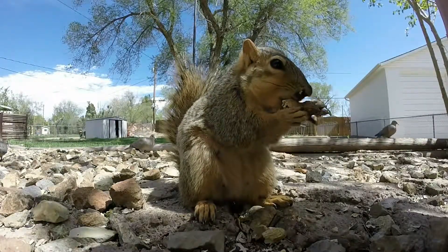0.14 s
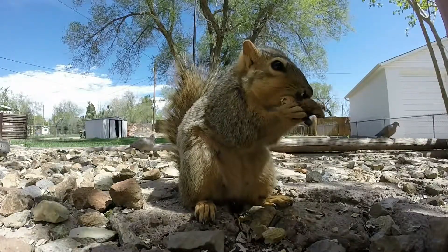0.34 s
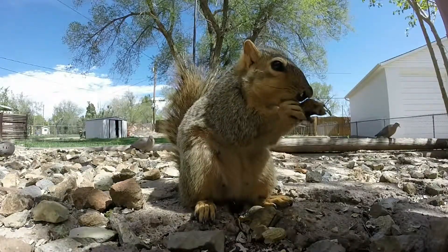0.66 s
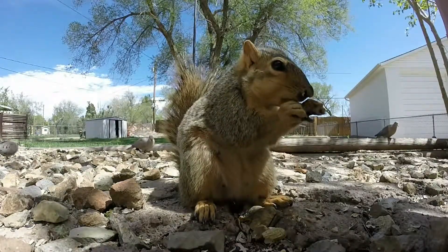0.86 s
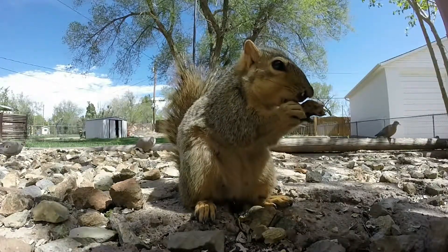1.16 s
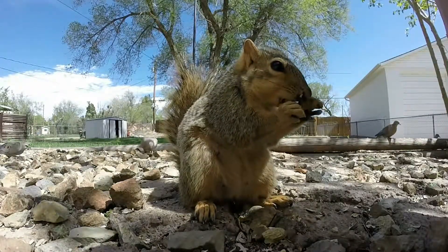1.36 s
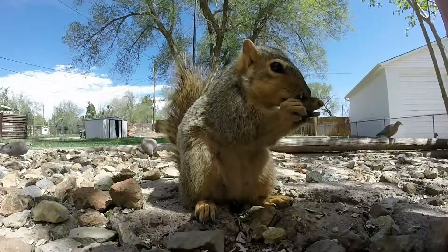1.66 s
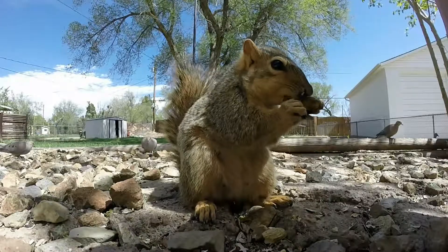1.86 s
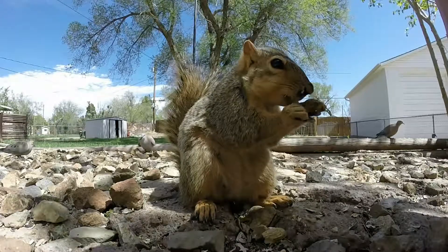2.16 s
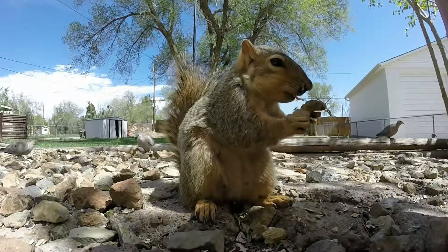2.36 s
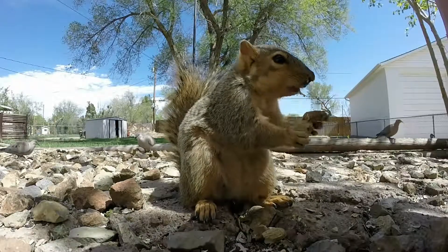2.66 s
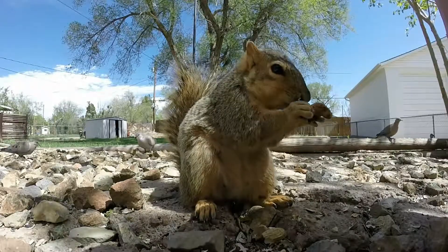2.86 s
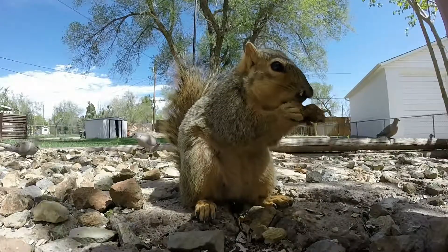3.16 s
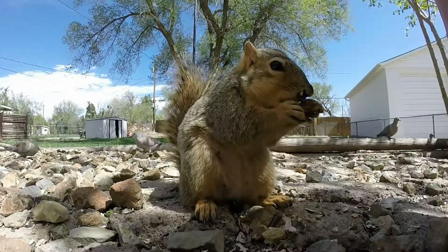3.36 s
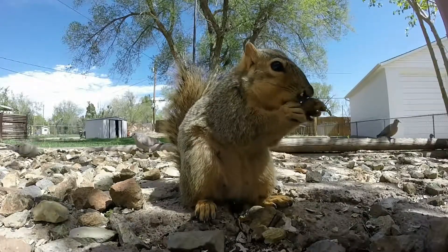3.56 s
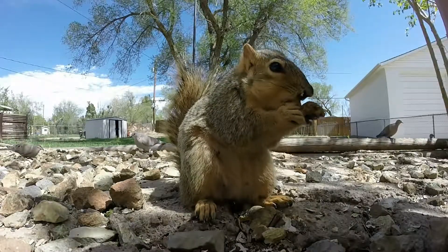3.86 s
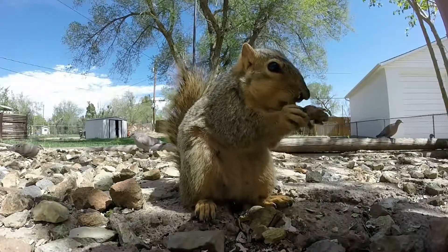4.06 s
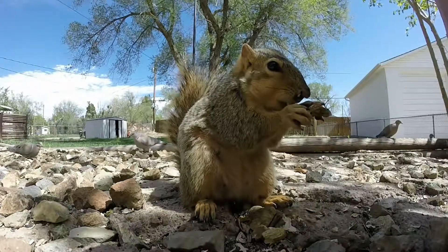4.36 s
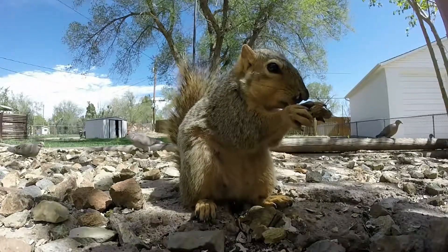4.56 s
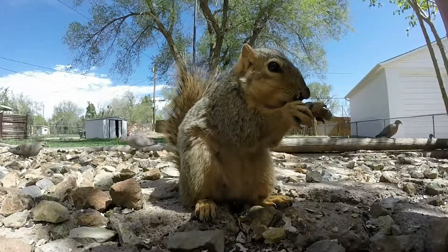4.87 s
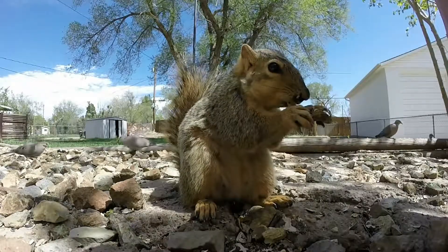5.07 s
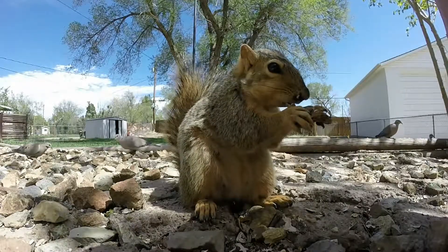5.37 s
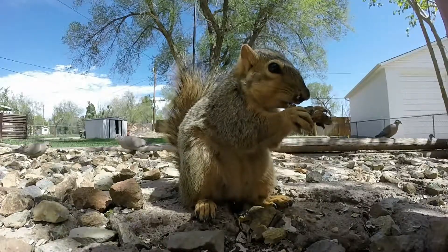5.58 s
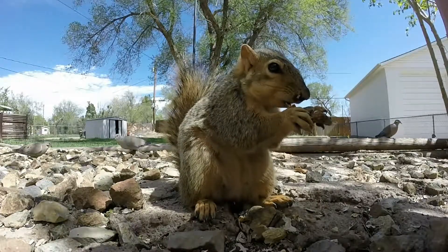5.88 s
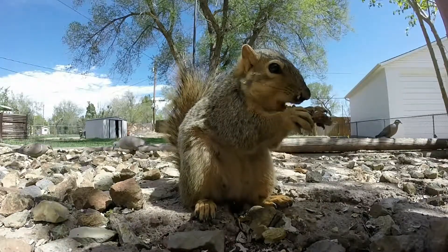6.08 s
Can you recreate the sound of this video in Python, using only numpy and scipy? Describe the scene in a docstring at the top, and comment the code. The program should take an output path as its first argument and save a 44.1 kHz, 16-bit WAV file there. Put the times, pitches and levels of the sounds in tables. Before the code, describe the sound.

In a quiet backyard, a squirrel's teeth scrape and crack a hard shell right by the microphone. It opens with sharp, high snaps as pieces break off, then goes on with rapid, crisp nibbling and short rests. The gnawing grows sparse and dies down toward the end, leaving a few faint, distant bird chirps, a low outdoor rumble and a barely audible pulsing hiss.

```python
"""A squirrel gnawing in a backyard

Close by, a squirrel's front teeth nibble a hard morsel in quick bouts, now and then drag
over its shell and snap pieces off. All of this makes the same short, bright tones ring.
Small birds chirp far away over a soft outdoor rumble and a faint pulsing hiss."""
import sys
import numpy as np
from scipy import signal
from scipy.fft import rfft, irfft
from scipy.io import wavfile

SR = 44100
rng = np.random.default_rng(int(sys.argv[2]) if len(sys.argv) > 2 else 0)


def persist_wave(psi):
    """Save psi, clipped to +-1, as 16-bit WAV."""
    counts = np.round(np.clip(psi, -1, 1) * 32767).astype(np.int16)
    wavfile.write(sys.argv[1], SR, np.atleast_2d(counts).T)


N = 274593
TIME = np.arange(N) / SR


def from_db(db):
    """Turn decibels into a number to multiply by."""
    return 10 ** (np.asarray(db) / 20)


def rms_one(x):
    """Scale a signal so that its average power is 1."""
    return x / np.sqrt(np.mean(x ** 2) + 1e-20)


def with_energy(rows, db):
    """Scale each row to its own total energy, given in dB."""
    return rows * (from_db(db) / np.linalg.norm(rows, axis=1))[:, None]


def drift(rate):
    """A random wander of about size 1 that turns about `rate` times a second."""
    points = rng.standard_normal(N // 20)
    return rms_one(np.interp(TIME * rate, np.arange(len(points)), points))


def noise(spectrum):
    """Noise of power 1, shaped by rows of frequency and level."""
    hz, db = np.transpose(spectrum)
    bins = np.maximum(np.fft.rfftfreq(N, 1 / SR), 1)
    gain = from_db(np.interp(np.log(bins), np.log(hz), db))
    return rms_one(irfft(rfft(rng.standard_normal(N)) * gain, N))


def ring(clicks, hz, width_hz):
    """Each click starts a tone; the greater the width, the sooner it fades."""
    decay, turn = np.exp(-np.pi * width_hz / SR), 2 * np.pi * hz / SR
    return signal.lfilter([0, np.sin(turn)], [1, -2 * decay * np.cos(turn), decay ** 2], clicks + 1e-18)


def arch(middle_s, length_s):
    """The samples that a short sound covers, and its smooth rise and fall."""
    start = max(int((middle_s - length_s / 2) * SR), 0)
    end = max(int((middle_s + length_s / 2) * SR), 0)
    return slice(start, end), np.cos(np.pi * (TIME[start:end] - middle_s) / length_s)


# The outdoor rumble. Each row: frequency in Hz, relative level in dB.
YARD_SPECTRUM = [(12, -34), (20, -4), (49, -2), (129, -4.5), (213, -7), (238, -8), (333, -10.5), (549, -14),
                 (649, -15.5), (1010, -18.5), (1130, -19.5), (4550, -28.5), (12100, -41.5), (13900, -41.5),
                 (15500, -53)]
def background(level_db=-56, sway_db=0.54, whine_db=-84):
    """Far traffic and air rumble softly, with a faint narrow hiss high up."""
    whine = rms_one(ring(rng.standard_normal(N), hz=8700, width_hz=450))
    rumble = from_db(level_db + sway_db * drift(4.18)) * noise(YARD_SPECTRUM)
    return rumble + from_db(whine_db) * whine


# The ringing tones of morsel and jaw. Each row: pitch in Hz, width in Hz, relative level in dB.
SHELL_TONES = [(2940, 300, -24), (3285, 210, -8.5), (3530, 140, -15.5), (4640, 190, 5.5), (5020, 320, -0.5),
               (5340, 470, -31), (5570, 110, -12.5), (6030, 115, -12), (6400, 240, -11.5), (6900, 210, -11),
               (7300, 410, -28), (8280, 220, -23.5), (9370, 380, -20.5), (10470, 360, -22.5),
               (11400, 280, -25.5), (12600, 400, -26), (14000, 900, -29)]
def shell(force, low_hz, high_hz, scatter_db):
    """The shell rings in one pitch range; scatter varies the tones' levels for each row of force."""
    rings = sum(from_db(db + scatter_db * rng.standard_normal((len(force), 1))) * ring(force, hz, width)
                for hz, width, db in SHELL_TONES if low_hz < hz < high_hz)
    return signal.sosfilt(signal.butter(3, [low_hz, high_hz], "band", fs=SR, output="sos"), rings)


# The shell's low, main, upper and top ranges. Each row: lower edge in Hz, upper edge in Hz.
PITCH_RANGES = [(2650, 3900), (4100, 5600), (5400, 7800), (7800, 15000)]
def range_gains(shares_db, hollow_db, bright_db, top_share=0.87):
    """Where the tooth lands sets the mix: hollowness lifts the low range, brightness the highest two."""
    lifts_db = [hollow_db, 0, bright_db, top_share * bright_db]
    return [from_db(share + lift) for share, lift in zip(shares_db, lifts_db)]


# How hard the squirrel nibbles, in bouts with rests. Each row: time in seconds, relative level in dB.
NIBBLE_EFFORT = [(0.0, -72), (0.14, -70), (0.18, -56), (0.42, -59.5), (0.69, -64), (0.8, -76), (0.9, -64),
                 (1.22, -79), (1.37, -58.5), (1.7, -68), (2.05, -67), (2.5, -82), (2.66, -60), (2.84, -85),
                 (3.15, -66.5), (3.76, -64), (4.05, -76), (6.23, -86)]
def nibbles(strokes_per_s=24, stroke_s=0.018, unevenness=0.25, spread_db=4, hollow_db=-5, bright_db=1):
    """List quick, light tooth strokes at the jaw's uneven pace, in rows like the drags below."""
    timing, strength = rng.standard_normal((N // 1000, 2)).T
    times = np.cumsum(np.exp(unevenness * timing)) / strokes_per_s
    levels = np.interp(times, *np.transpose(NIBBLE_EFFORT)) + spread_db * np.clip(strength, -2, 2)
    return [(middle, stroke_s, db, hollow_db, bright_db) for middle, db in zip(times, levels)]


# A scrape's share in each of the four ranges, low to top, in dB.
SCRAPE_MIX_DB = [-10, 0.5, -6, -20]
# Longer drags of the teeth. Each row: middle and length in seconds, then relative level,
# hollowness and brightness in dB.
TOOTH_DRAGS = [(0.06, 0.047, -56.5, -5, -11), (0.286, 0.053, -50.5, -8, -3.5), (1.527, 0.039, -58, 3, 0),
               (2.226, 0.026, -56, 0, -2), (2.274, 0.034, -61, 7.5, 2.5), (2.317, 0.029, -58, 11.5, 2),
               (2.378, 0.035, -59, 5, 4), (3.925, 0.033, -60, -2, 0)]
def scrapes(level_db=-2.0, slips_per_s=900):
    """In every drag and nibble the teeth stick and slip very fast, which rings the shell."""
    slips = (rng.random((1, N)) < slips_per_s / SR) * rng.standard_normal((1, N))
    rings = np.array([rms_one(shell(slips, *edges, scatter_db=0)[0]) for edges in PITCH_RANGES])
    out = np.zeros(N)
    for middle, length, db, hollow_db, bright_db in list(TOOTH_DRAGS) + nibbles():
        part, pressure = arch(middle, length)
        gains = range_gains(SCRAPE_MIX_DB, hollow_db, bright_db)
        out[part] += from_db(level_db + db) * pressure * np.dot(gains, rings[:, part])
    return out


# A snap's share in each of the four ranges, low to top, in dB.
SNAP_MIX_DB = [-10.5, 0, -4.5, -17.5]
# The shell cracks. Each row: time in seconds, then relative level, hollowness and brightness in dB.
SHELL_CRACKS = [(0.169, -37.5, -4, -9), (0.175, -41, -6, -14), (0.278, -41, -4, -6), (0.2902, -37, -9, -8),
                (0.334, -44, -6, -8), (0.367, -32.5, 4.5, -4), (0.3744, -13.5, -0.5, -5.5),
                (0.4012, -46, -12, -1), (0.429, -50, 8, 1), (0.536, -48.5, -12, -18),
                (0.7114, -22, -8, -8.5), (0.7558, -32, 6, 2), (0.769, -23.5, 5, -7.5),
                (0.9441, -37.5, 5, -2.5), (1.345, -47, 2, -10), (1.376, -41, 0, 0), (1.407, -49, 0, 4),
                (1.6246, -44.5, 0, 0), (1.6741, -38, 0, 2), (1.951, -53, 10.5, 6), (1.9903, -46.5, 0, 0),
                (2.0268, -46.5, 2, 8.5), (2.0919, -46.5, 0, -4), (2.1624, -40.5, -1, -2),
                (2.1669, -32, 2.5, 5.5), (2.387, -33, 0.5, 3.5), (2.632, -42, 3, 6.5),
                (2.6943, -34, -7, 2.5), (2.7276, -50.5, -7, -3), (3.088, -51, -6, -1), (3.2812, -50, 6, 4),
                (3.4117, -46.5, -1, 6), (3.4214, -50.5, 2, 9.5), (3.457, -45, -5, 0.5), (3.79, -45.5, 5, 3),
                (3.91, -49, 2, -1), (4.8572, -54.5, -4, 1)]
def snaps(level_db=15, strain_db=-26, strain_s=0.0015, crumble_db=-17, crumble_s=0.0032,
          crumbs_per_s=9000, knock_db=-29):
    """Each break rings the shell: tiny cracks build up, one sharp click follows, a spray dies away."""
    times, db, hollow_db, bright_db = np.transpose(SHELL_CRACKS)
    steps = np.arange(-(SR // 100), SR // 40)  # samples before and after the click
    from_click_s = np.abs(steps) / SR
    draws = rng.random((len(times), 2, len(steps)))
    crumbs = (draws[:, 0] < crumbs_per_s / SR) * np.sign(draws[:, 1] - .5)
    build_up = from_db(strain_db) * np.exp(-from_click_s / strain_s)
    spray = from_db(crumble_db) * np.exp(-from_click_s / crumble_s)
    force = crumbs * np.where(steps < 0, build_up, spray)
    force[:, steps == 0] = 1  # the sharp click
    # the soft kernel adds a faint, dull knock under the ringing
    knock = ring(np.diff(force, prepend=0), hz=1900, width_hz=800)
    sounds = with_energy(knock, level_db + db + knock_db)
    for edges, gain in zip(PITCH_RANGES, range_gains(SNAP_MIX_DB, hollow_db, bright_db)):
        ringing = with_energy(shell(force, *edges, scatter_db=2.0), level_db + db)
        sounds += np.reshape(gain, (-1, 1)) * ringing
    where = np.round(times * SR).astype(int)[:, None] + steps
    return np.bincount(where.ravel(), sounds.ravel(), N)[:N]  # add each snap in at its time


# The tone of the pulsing hiss. Each row: frequency in Hz, relative level in dB.
HISS_SPECTRUM = [(300, -9), (750, 14), (1200, 15.5), (1600, 5), (3000, 3.5), (6000, 0), (7800, -11),
                 (9100, 1.5), (11000, 0), (13600, -4), (15000, -9)]
def hiss(first_peak_s=0.486, period_s=0.668, length_s=0.19, level_db=-71.5, flicker_db=5.0):
    """A thin hiss that swells at a steady pace and flickers a little."""
    from_peak_s = np.abs((TIME - first_peak_s + period_s / 2) % period_s - period_s / 2)
    swell = np.exp(-(2 * from_peak_s / length_s) ** 4)
    return from_db(level_db + flicker_db * drift(110)) * swell * noise(HISS_SPECTRUM)


# Distant chirps. Each row: middle and length in seconds, pitch in Hz, glide in octaves
# per second, relative level in dB.
BIRD_CHIRPS = [(0.905, 0.11, 3590, 0.3, -71), (1.045, 0.085, 3620, -0.3, -72), (3.027, 0.076, 5960, 1, -72),
               (3.28, 0.082, 3690, 2, -68), (4.214, 0.035, 6970, 2, -70), (4.317, 0.065, 4040, -9.5, -66),
               (4.486, 0.06, 3810, -12.5, -63), (5.212, 0.11, 3750, 2, -71), (5.545, 0.06, 6400, -3, -75),
               (5.83, 0.099, 3420, 0.5, -73), (5.996, 0.074, 3500, 1, -70)]
def birds(level_db=-1.0, waver_share=0.018, flutter_db=3.0):
    """Small birds give short, buzzy, gliding chirps, broken up by distance."""
    waver = 1 + waver_share * drift(450)
    flutter = from_db(flutter_db * drift(250))
    out = np.zeros(N)
    for middle, length, pitch_hz, glide, db in BIRD_CHIRPS:
        part, swell = arch(middle, length)
        hz = pitch_hz * 2 ** (glide * (TIME[part] - middle)) * waver[part]
        tone = np.sqrt(2) * np.sin(2 * np.pi * np.cumsum(hz) / SR)
        out[part] += from_db(db + level_db) * swell * flutter[part] * tone
    return out


def echo(x, fade_s, level_db, rise_s=0.0017):
    """Gravel, fences and walls throw back a blurred echo that drops 60 dB in fade_s."""
    age = np.arange(SR // 2) / SR
    tail = rng.standard_normal(len(age)) * from_db(-60 * age / fade_s) * (1 - np.exp(-age / rise_s))
    return from_db(level_db) * signal.fftconvolve(x, tail / np.linalg.norm(tail))[:N]


def scene():
    """The squirrel close by and the yard behind it, in one channel."""
    teeth, song = snaps() + scrapes(), birds()
    near = teeth + echo(teeth, fade_s=0.061, level_db=-25)
    far = song + echo(song, fade_s=0.19, level_db=-6.5) + background()
    return (near + far + hiss())[None]


def record(dry, cutoff_hz=15400):
    """Cut the very highest treble away steeply."""
    return signal.sosfilt(signal.ellip(10, .1, 80, cutoff_hz, fs=SR, output="sos"), dry)


dry = scene()
out = record(dry)
persist_wave(out)
```